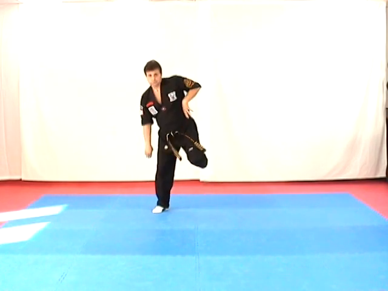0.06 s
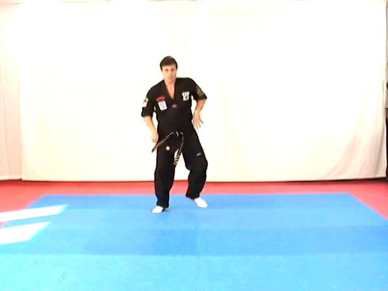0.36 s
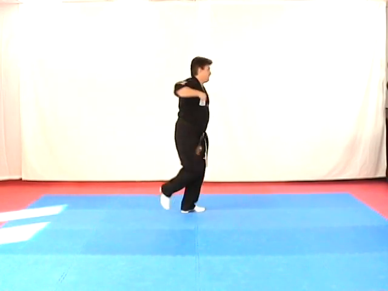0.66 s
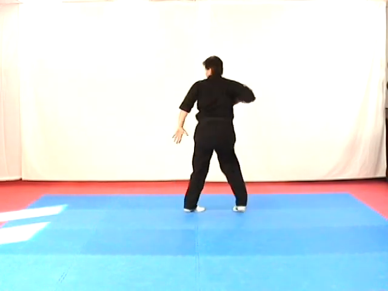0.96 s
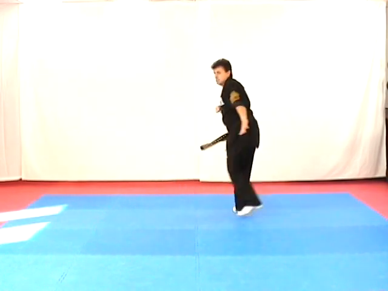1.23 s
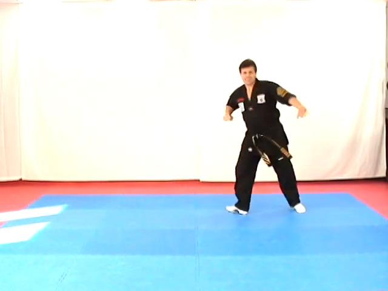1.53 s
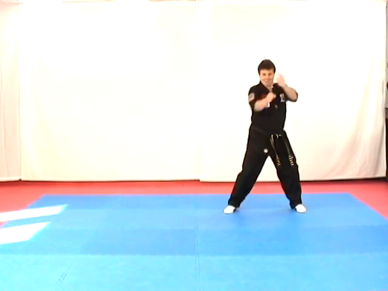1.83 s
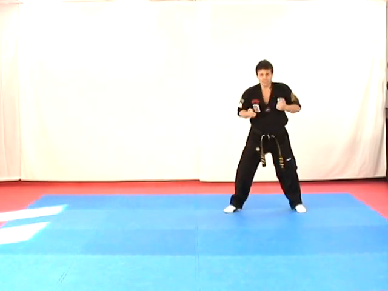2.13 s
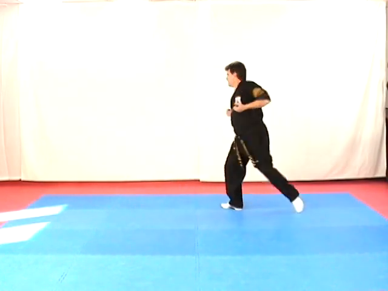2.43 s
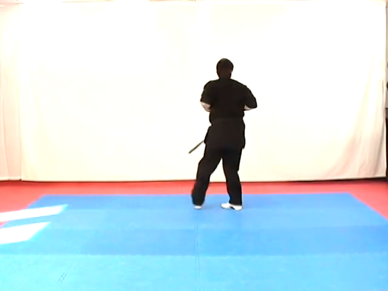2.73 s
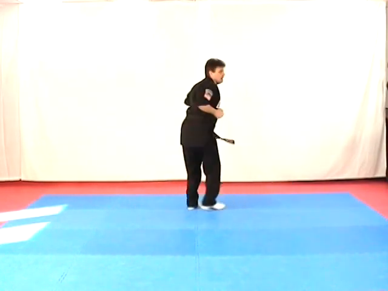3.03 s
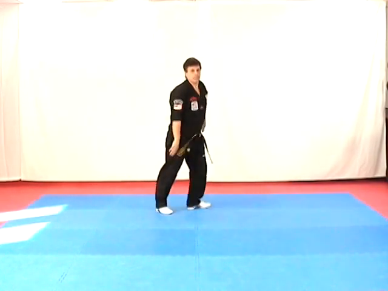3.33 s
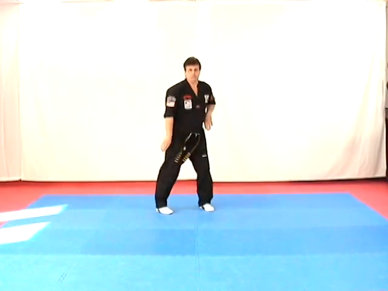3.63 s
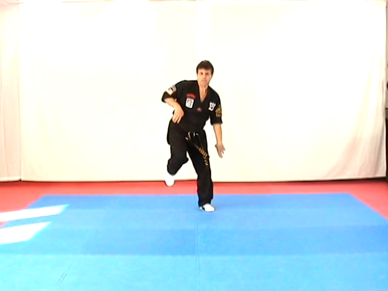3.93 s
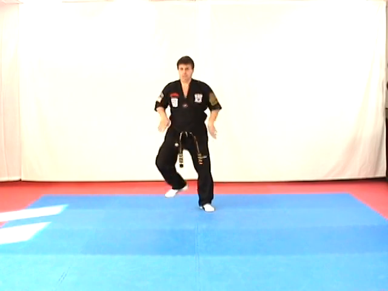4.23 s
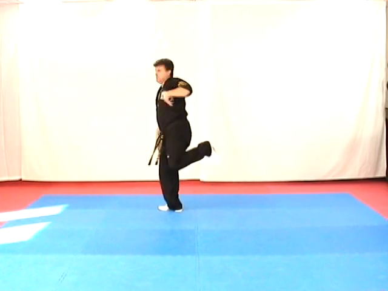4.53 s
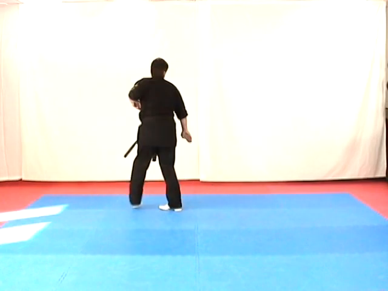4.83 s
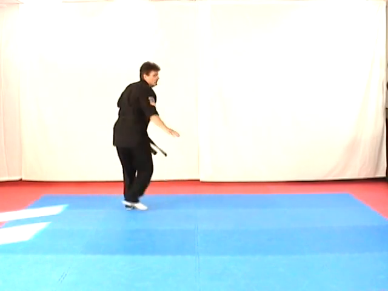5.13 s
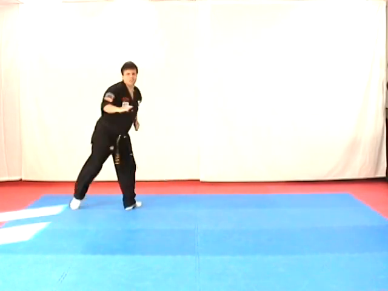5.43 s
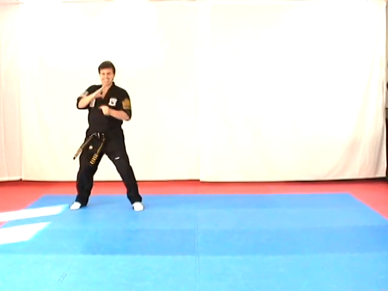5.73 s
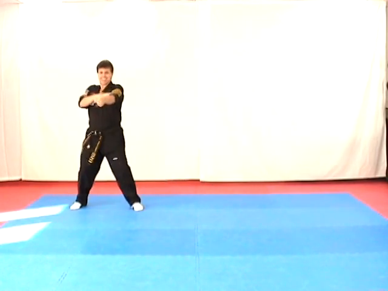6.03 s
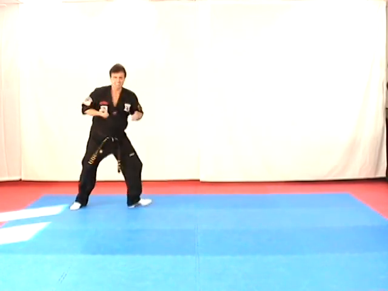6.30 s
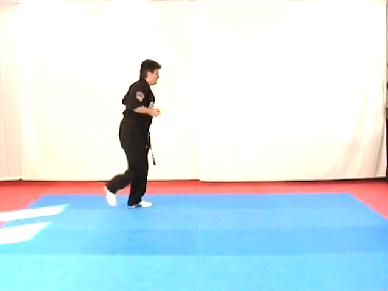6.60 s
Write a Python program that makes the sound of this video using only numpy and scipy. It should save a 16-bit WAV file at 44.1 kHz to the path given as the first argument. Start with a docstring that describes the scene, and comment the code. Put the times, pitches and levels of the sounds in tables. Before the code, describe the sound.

In a small studio, feet thud dully and scuff on foam mats while a heavy cotton uniform swishes through turns. Three loud hand strikes land on the body about two seconds apart: a sharp open-palm slap, a deeper thump, then a cupped, popping slap. Each has a short room echo. Ventilation hums steadily underneath, and the microphone level dips slightly at the loudest hits and creeps back.

```python
"""In a small studio a martial artist turns through a form on foam mats. Three hand strikes crack
against the body, each an impact with a pop of trapped air. Feet thud on the foam, and friction makes
the soles scuff and the heavy cotton uniform swish. The walls reflect these sounds, and ventilation
hums underneath. Automatic gain control ducks at the loud strikes and creeps back up."""
import sys
import numpy as np
from scipy import signal
from scipy.fft import rfft, irfft
from scipy.io import wavfile
from scipy.ndimage import uniform_filter1d

SR = 44100
rng = np.random.default_rng(int(sys.argv[2]) if len(sys.argv) > 2 else 0)


def waveform_to_disk(signal):
    """Save audio, clipped to [-1, 1], as 16-bit WAV at the path in sys.argv[1]."""
    frames = np.transpose(np.atleast_2d(signal))
    scaled = np.clip(frames, -1, 1) * 32767
    samples = np.round(scaled).astype(np.int16)
    wavfile.write(sys.argv[1], SR, samples)


N = 298204
TIME = np.arange(N) / SR
AGE = TIME[:SR // 2]  # seconds within one event
TOP_HZ = 15000

# Footfalls. Each row: start in seconds, thud level in dB, scuff level in dB, scuff length in seconds.
FOOTFALLS = [(.465, -25, -60, .02), (.543, -30.5, -66, .02), (.925, -36, -63, .03),
             (0.9993, -21.5, -60, .01), (1.512, -30, -44.5, 0.038), (2.488, -33.5, -66, .02),
             (2.848, -25.5, -39, .005), (2.894, -26, -62, 0.028), (2.991, -27, -59, .02),
             (3.244, -31.5, -48, 0.028), (3.413, -37, -51, 0.018), (3.606, -32.5, -50, .008),
             (3.777, -41.5, -46, 0.016), (4.948, -28, -45, 0.039), (5.488, -27, -58, .02),
             (5.51, -29.5, -50, .03), (5.84, -31.5, -60, .01), (6.218, -54, -49, 0.023)]


def strikes(contact_s=0.001155, air_t60=0.026, snap_db=-19.5, snap_hz=(1100, 5500), room_t60=0.39):
    """Impact: a pressure pulse as the hand lands, crackle as skin flattens, and trapped air resonating."""
    # Hand contacts; in the first strike the fingers land just before the palm. Each row: start in
    # seconds, level in dB, crackle in dB, air resonance in Hz, pop in dB, low cut in Hz, room in dB.
    contacts = [(1.912, -37, 7, 820, 14, 500, -14), (1.9275, -9, 26, 614, 0, 453, 0.5),
                (4.3718, -7.5, 4, 443, -21, 70.4, 3), (5.8629, -13.5, 10, 746, 2.5, 464, -2)]
    # Spectra of an open-palm slap, a heavy blow on the trunk and a cupped slap.
    # Each row: frequency in Hz, gain in dB.
    open_palm = [(40, -35), (110, -28), (230, -4.5), (420, 0), (600, -0.5), (870, -3), (1130, 0),
                 (1450, -0.5), (1750, -1), (2300, -8), (3250, -4.5), (4300, -17), (5400, -10.5),
                 (6500, -20.5), (10000, -26.5), (15000, -43)]
    trunk = [(60, -8), (125, -8), (195, 10.5), (340, -1.5), (460, 4), (800, -7.5), (1250, -10),
             (2000, -18.5), (3100, -15.5), (3900, -27), (6500, -32.5), (10000, -42), (15000, -55)]
    cupped_palm = [(40, -44), (120, -5), (220, -3.5), (480, 1), (730, 0), (960, -6.5), (1300, -3),
                   (2100, -7.5), (3100, -15), (4500, -17), (7500, -23), (11000, -35), (15000, -60)]
    out, pulse = np.zeros((2, N)), unit_burst(1. * (AGE == 0))
    for contact, spectrum in zip(contacts, (open_palm, open_palm, trunk, cupped_palm)):
        start, db, crackle_db, air_hz, pop_db, low_hz, room_db = contact
        slap = unit_burst(colour(pulse + undb(crackle_db) * patter(contact_s), spectrum))
        snap = undb(snap_db) * unit_burst(band(pulse, *snap_hz))
        ringing = np.sin(2 * np.pi * air_hz * AGE) * np.exp(-np.log(1000) * AGE / air_t60)
        pop = undb(pop_db) * unit_burst(ringing)
        # a small contact area sends little bass straight ahead
        direct = unit_burst(early_reflections(band(slap + snap + pop, low_hz, TOP_HZ)))
        room = unit_burst(reverberation(colour(pulse, spectrum), room_t60))
        add(out, start, undb(db) * unit_burst(direct + undb(room_db) * room))
    return out


def feet(firm_db=-23, roll_s=0.00373, room_db=1, room_t60=0.43):
    """Cushioned impact: the heel hits foam, then the sole rolls; softer steps are duller and roll more."""
    # Spectrum of a thud on foam. Each row: frequency in Hz, gain in dB.
    foam = [(25, -41), (50, -25), (110, -8.5), (165, 2.5), (240, -0.5), (420, -6.5), (750, -16.5),
            (1100, -24.5), (2000, -27.5), (3000, -39), (4500, -38), (9000, -59), (15000, -68)]
    out, heel = np.zeros((2, N)), unit_burst(1. * (AGE == 0))
    for start, db, _, _ in FOOTFALLS:
        softer_db = firm_db - db
        tilt = 0.5 - 0.31 * softer_db  # dB per octave
        sole = undb(2.5 + 0.97 * softer_db) * patter(roll_s)
        thud = unit_burst(early_reflections(colour(heel + sole, foam, tilt)))
        room = unit_burst(reverberation(colour(heel, foam, tilt), room_t60))
        add(out, start, undb(db) * unit_burst(thud + undb(room_db) * room))
    return out


def swishes(brisk_db=-47, scuff_lag_s=0.004, scuff_tilt=0.1, grain_db=2.5, room_db=-6, room_t60=0.35):
    """Stick-slip friction: fibres catch and slip in tiny grains; faster rubbing is louder and brighter."""
    # Moves of cloth and pivoting soles. Each row: peak time in seconds, level in dB, half length in seconds.
    rubs = [(0.506, -48.5, 0.022), (0.627, -49, .024), (1.074, -42, 0.028), (1.573, -43.5, .036),
            (1.661, -41, 0.014), (1.734, -44, 0.023), (2.21, -48.5, 0.065), (2.479, -50, 0.039),
            (2.952, -41.5, 0.029), (3.034, -47, 0.021), (3.284, -43.5, 0.014), (3.399, -45.5, 0.036),
            (4.355, -44, 0.015), (5.057, -42.5, 0.031), (5.561, -46.5, 0.048), (5.66, -44, .028),
            (5.737, -46, 0.048), (6.345, -53, 0.045), (6.519, -50, .024)]
    # Spectrum of rubbing cotton. Each row: frequency in Hz, gain in dB.
    cotton = [(500, 8), (1500, -7.5), (3000, 1.5), (5000, 0.5), (8000, 0.5), (10500, -4), (13000, -14.5),
              (15500, -33)]
    out, middle = np.zeros((1, N)), AGE.mean()
    moves = [(peak, db, half, half, -0.5 + 0.27 * (db - brisk_db)) for peak, db, half in rubs]
    scuffs = [(start + scuff_lag_s, db, 0.28 * length, length, scuff_tilt)
              for start, _, db, length in FOOTFALLS]
    for peak, db, rise_s, fall_s, tilt in moves + scuffs:
        grains = rng.standard_normal(len(AGE)) * flicker(grain_db, samples=16)
        swell = np.exp(-((AGE - middle) / np.where(AGE < middle, rise_s, fall_s)) ** 2 / 2)
        add(out, peak - middle, undb(db) * swell * unit(colour(grains, cotton, tilt))[None])
    return out + undb(room_db) * reverberation(out[0], room_t60)


def ventilation(air_db=-38.5, sway_db=0.37):
    """Flow noise: air rushes over the unsteady hum of a fan and the low resonances of the room."""
    # Spectrum of rushing air. Each row: frequency in Hz, gain in dB.
    air_spectrum = [(25, -5.5), (45, 1.5), (80, -8.5), (150, -1.5), (230, -12), (370, -14.5), (520, -17.5),
                    (700, -19.5), (1050, -19.5), (1700, -24), (2800, -33), (4700, -36.5), (6000, -36.5),
                    (7200, -42.5), (10000, -46), (15000, -57.5)]
    # Stereo width of the air. Each row: frequency in Hz, side relative to mid in dB.
    air_width = [(60, -20), (110, -22), (200, -12.5), (380, -8), (700, -6.5), (1290, -2.5), (2380, -3.5),
                 (4400, -7.5), (8120, -7), (15000, -23)]
    # Tones of the hum. Each row: frequency in Hz, level in dB, unsteadiness from 0 to 1.
    hum_tones = [(36.7, -52.5, 0.47), (54.5, -50.5, 0.18), (58.8, -44, 1), (143.8, -50, 0.4),
                 (161.1, -47, 0.72), (186.1, -52.5, 1), (522, -60.5, 0.92)]
    mid, side = (colour(rng.standard_normal(N), air_spectrum) for _ in range(2))
    air = unit(stereo(mid, side, air_width)) * undb(air_db + sway_db * drift(5.2))
    hum = 0
    for hz, db, unsteady in hum_tones:
        phase = 2 * np.pi * (hz * TIME + rng.random())
        wavering = drift(12) * np.cos(phase) + drift(12) * np.sin(phase)
        hum = hum + undb(db) * unit((1 - unsteady) * np.cos(phase) + unsteady * wavering)
    return air + hum


def early_reflections(x, scatter=0.06, cutoff_hz=6000):
    """Specular reflection: delayed copies join the direct sound and shift as the performer moves."""
    # Echoes off floor and walls. Each row: delay in seconds, gain as a factor.
    echoes = [(.0022, 0.14), (.0056, 0.24), (.0072, 0.49), (0.0099, .25), (0.0285, 0.26)]
    dulled = signal.sosfilt(signal.butter(1, cutoff_hz, fs=SR, output="sos"), x)
    lags = [int(abs(delay * SR * (1 + scatter * rng.standard_normal()))) for delay, _ in echoes]
    return x + sum(gain * np.pad(dulled, (lag, 0))[:len(x)] for lag, (_, gain) in zip(lags, echoes))


def reverberation(x, t60):
    """Diffuse field: the sound is convolved with the studio's decay, left and right."""
    # Stereo width of the room. Each row: frequency in Hz, side relative to mid in dB.
    room_width = [(60, -5), (200, -19), (500, -10), (1100, -6.5), (3000, -7), (8000, -5), (12000, -12)]
    response = stereo(room_tail(t60), room_tail(t60), room_width)
    return signal.fftconvolve(x[None], response, axes=1)[:, :len(x)]


def room_tail(t60, treble_hz=4700, build_s=0.0096, clump_db=1.5):
    """Absorption: clumps of wall reflections build up, then die away, the treble first."""
    hz, seconds, cells = signal.stft(rng.standard_normal(len(AGE)), SR, nperseg=1024)
    decay_rate = np.log(1000) / t60
    treble_loss = np.sqrt(1 + (hz[:, None] / treble_hz) ** 2 / 2) - 1
    evened = cells / np.sqrt(np.abs(cells))
    tail = signal.istft(evened * np.exp(-decay_rate * treble_loss * seconds), SR)[1][:len(AGE)]
    envelope = (1 - np.exp(-AGE / build_s)) * np.exp(-decay_rate * AGE)
    tail = tail * flicker(clump_db, samples=90) * envelope
    return tail / np.linalg.norm(tail)


def patter(length_s, passes=3):
    """Spectral whitening: a short swell of tiny contacts is evened out so that it has no pitch."""
    swell = AGE / length_s * np.exp(-AGE / length_s)
    burst = rng.standard_normal(len(AGE)) * swell
    for _ in range(passes):
        flat_spectrum = np.exp(1j * np.angle(rfft(burst)))
        burst = irfft(flat_spectrum, len(AGE)) * np.sqrt(swell)
    return unit_burst(burst)


def flicker(depth_db, samples):
    """Amplitude modulation: a random gain, smoothed over some samples."""
    return undb(depth_db * unit(uniform_filter1d(rng.standard_normal(len(AGE)), size=samples)))


def drift(rate):
    """Band-limited noise: a smooth curve that changes about rate times a second."""
    knots = signal.resample(rng.standard_normal(200), 2000)
    return np.interp(TIME * rate * 10, np.arange(len(knots)), knots)


def colour(x, points, tilt=0):
    """Minimum-phase filtering through (Hz, dB) points, with a tilt in dB per octave."""
    size = 4096
    octave = np.log2(np.maximum(np.fft.rfftfreq(size, 1 / SR), 20))
    hz, db = np.transpose(points)
    log_gain = np.log(undb(np.interp(octave, np.log2(hz), db) + tilt * octave))
    cepstrum = irfft(log_gain)[:size // 2]
    cepstrum[1:] *= 2  # folding the cepstrum makes the filter causal
    response = irfft(np.exp(rfft(cepstrum, size)))
    return signal.oaconvolve(x, response)[:len(x)]


def band(x, low_hz, high_hz):
    """Band-pass filtering, 12 dB per octave on both sides."""
    return signal.sosfilt(signal.butter(2, [low_hz, high_hz], "band", fs=SR, output="sos"), x)


def stereo(mid, side, width):
    """Sum and difference: left and right from mid and a weaker side."""
    side = colour(side, width)
    return np.array([mid + side, mid - side])


def undb(db):
    """Decibels to amplitude ratio."""
    return 10 ** (np.asarray(db) / 20)


def unit(x):
    """Power normalisation to rms 1."""
    return x / np.sqrt(np.mean(x ** 2))


def unit_burst(x):
    """Energy normalisation to that of a 30 ms burst of rms 1."""
    return unit(x) * np.sqrt(.03 * SR / x.shape[-1])


def add(out, start_s, sound):
    """Superposition: a sound joins the mix at its start time."""
    start = int(start_s * SR)
    out[:, start:start + sound.shape[1]] += sound[:, :N - start]


def scene(left_db=0.37):
    """Superposition of all sources in the studio, a little louder on the left."""
    return (strikes() + feet() + swishes() + ventilation()) * undb([[left_db], [-left_db]])


def record(dry, ceiling_db=-14.5, recovery_db_per_s=2.5, window_s=0.0061, full_scale=0.76):
    """Limiting: gain drops at once on a loud blow and recovers slowly; peaks saturate, the top is cut."""
    power = uniform_filter1d(np.mean(dry ** 2, axis=0), int(window_s * SR))
    excess_db = np.maximum(10 * np.log10(np.abs(power) + 1e-12) - ceiling_db, 0)
    recovery_db = recovery_db_per_s * TIME
    duck_db = np.maximum.accumulate(excess_db + recovery_db) - recovery_db
    rounded = full_scale * np.tanh(dry * undb(-duck_db) / full_scale)
    return signal.sosfilt(signal.ellip(8, .2, 70, TOP_HZ, fs=SR, output="sos"), rounded)


dry = scene()
out = record(dry)
waveform_to_disk(out)
```